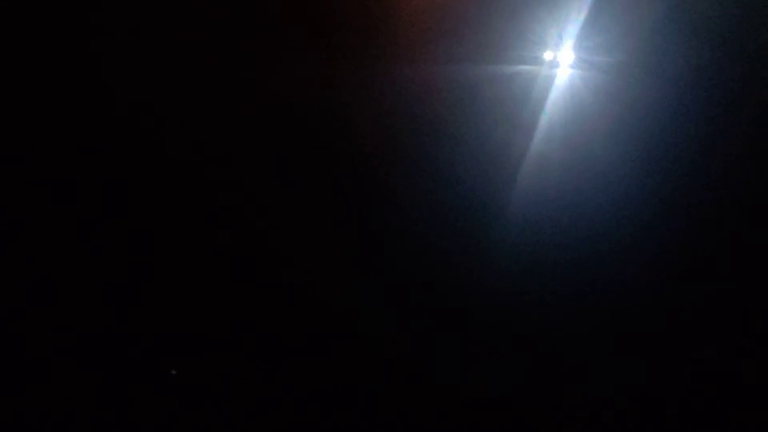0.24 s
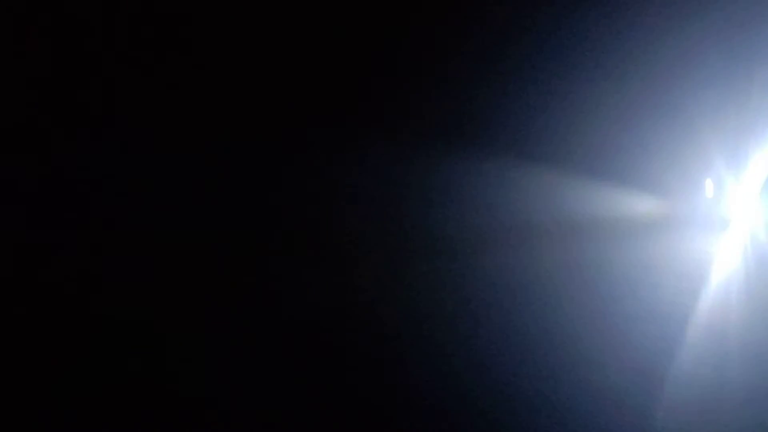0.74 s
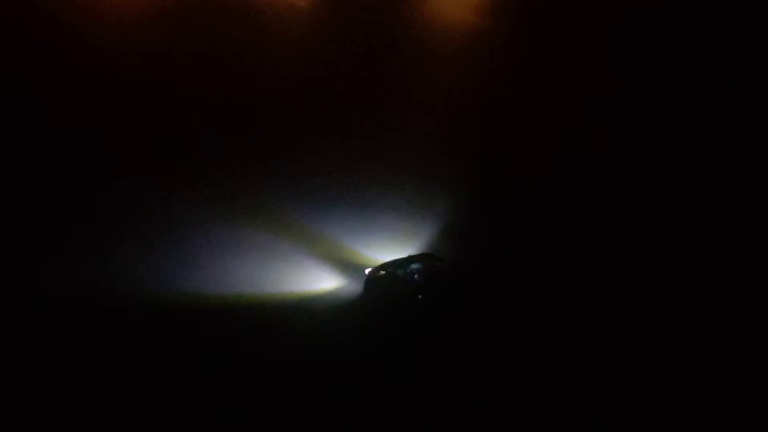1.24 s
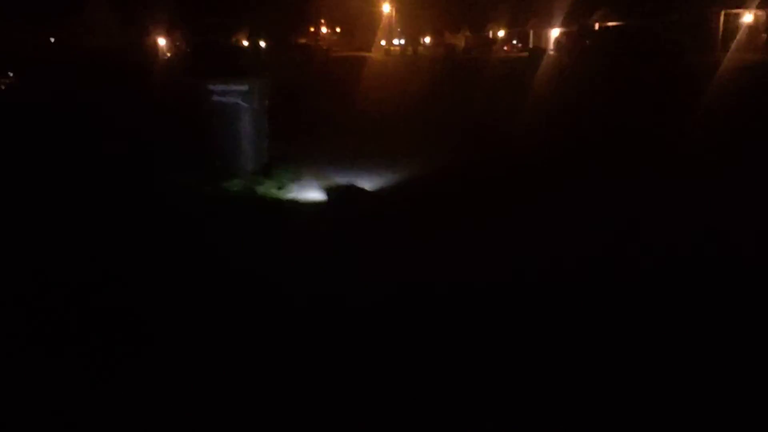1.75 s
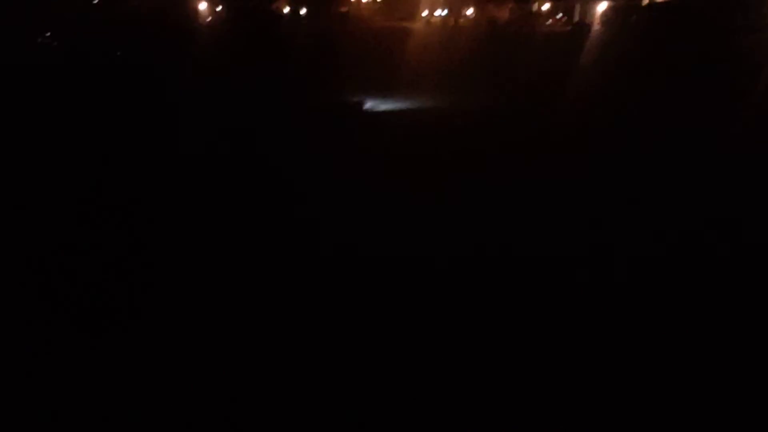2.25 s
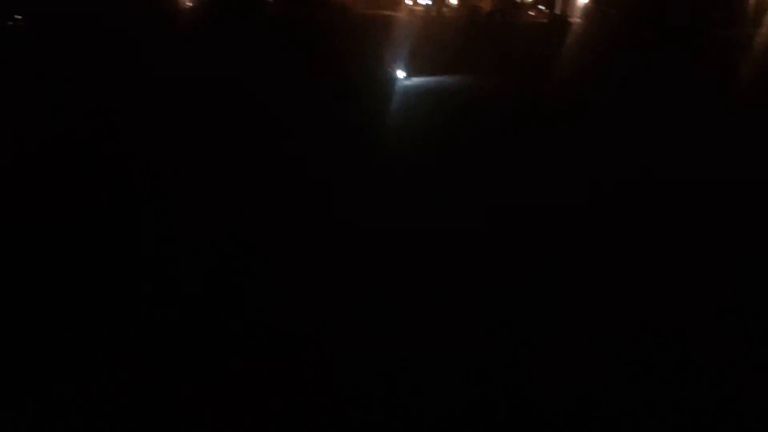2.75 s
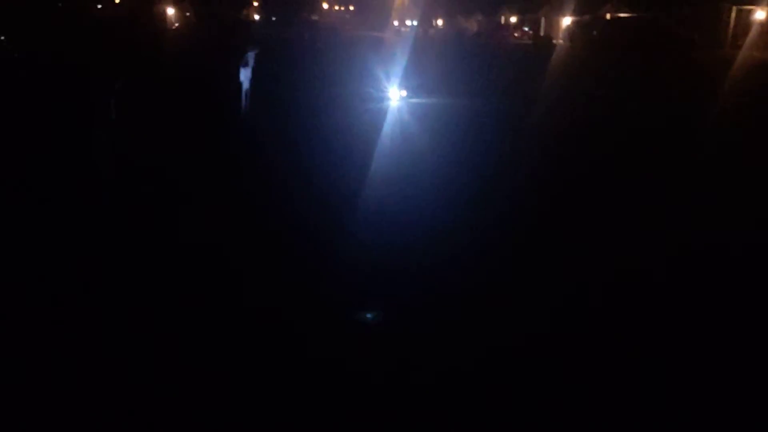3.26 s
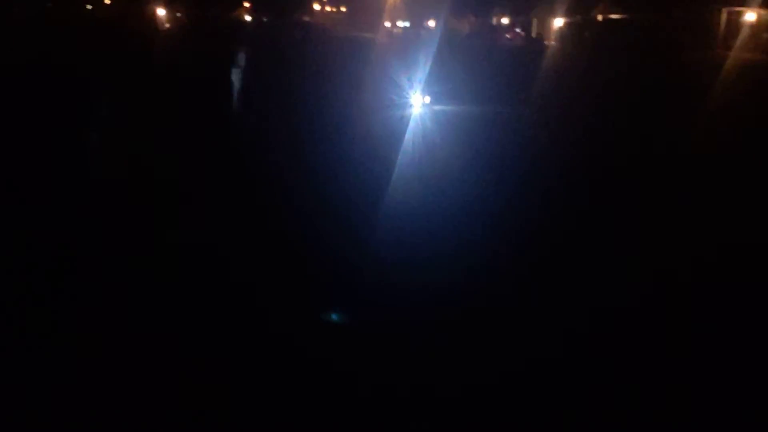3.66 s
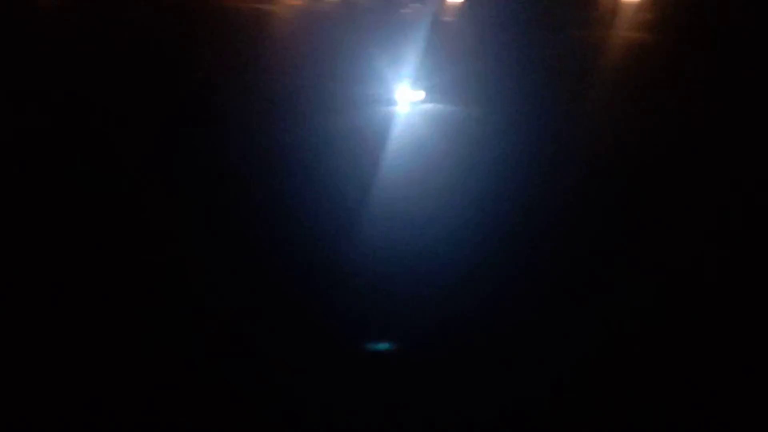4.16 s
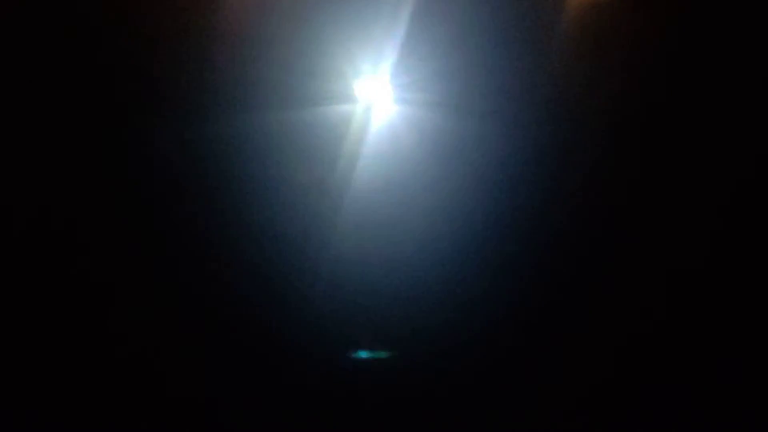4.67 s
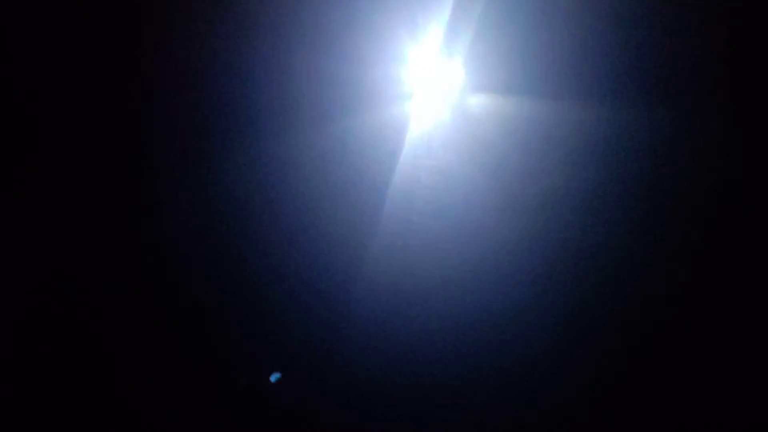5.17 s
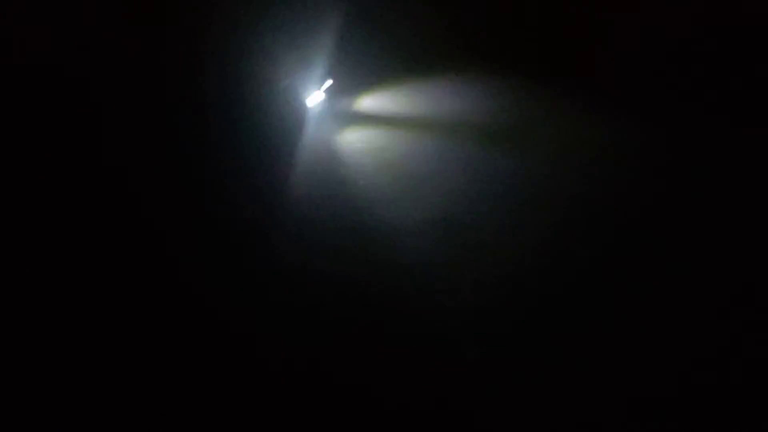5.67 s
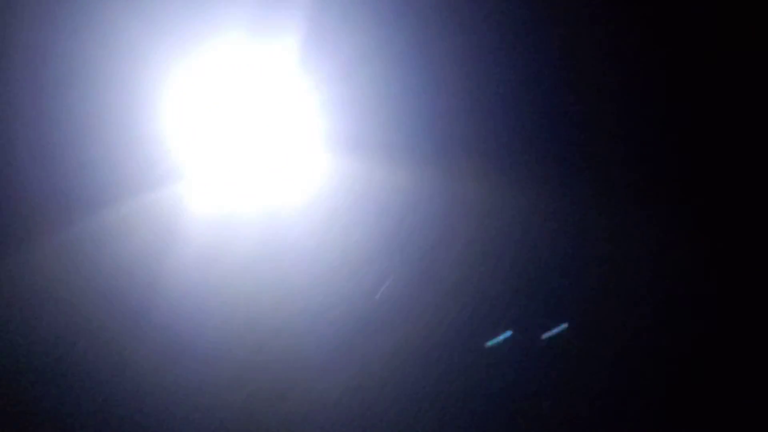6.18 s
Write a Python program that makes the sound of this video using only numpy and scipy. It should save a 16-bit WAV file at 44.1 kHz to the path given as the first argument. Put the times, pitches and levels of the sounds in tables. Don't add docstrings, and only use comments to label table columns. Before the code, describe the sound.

Open ground outdoors, close handheld stereo, almost no echo. A radio-controlled car is already spinning its wheels: a piercing, airy gear scream around 8.5 kHz with harsh plastic rattle. At 0.5 s the trigger knocks at left and pitch drops to about 4.7 kHz, then sags, buzzing, as tyres scrabble near 1 s. A brief stab to 5 kHz at 1.75-1.85 s comes with a cluster of trigger clicks until 2.0 s. The whine sinks through 2-2.8 s to a low, faint growl and nearly vanishes by 3.15 s. It pulls up at 3.2-3.4 s, then holds a higher scream at 3.55-3.95 s before falling. Pebbles tick around 4.1-4.2 s. The loudest, harshest blip bursts at 4.76-4.93 s. From 5.25 s to the end at 6.4 s, a rough 1.5 kHz whine continues with skids, drags and small dull bumps, now shifting slightly left. Distant traffic rumbles softly throughout.

```python
import sys
import numpy as np
from scipy import signal
from scipy.fft import rfft, irfft, next_fast_len
from scipy.io import wavfile
from scipy.ndimage import uniform_filter1d, map_coordinates

SR = 44100
rng = np.random.default_rng(int(sys.argv[2]) if len(sys.argv) > 2 else 0)


def volts(x):
    e = np.asarray(x, float) / 20
    return 10 ** e


def dump(signal):
    limited = np.clip(np.atleast_2d(signal).T, -1, 1)
    pcm = np.round(limited * 32767).astype(np.int16)
    wavfile.write(sys.argv[1], SR, pcm)


N = 283122

PINION_TEETH, GEAR_TEETH = 19, 47
FREE_HZ = 8700
EASE_HZ = 1200

# time_s, mesh_hz, rattle_db, whine_trim_db, brightness_db
ROLLING = [(0, 4720, -37, 1, 0), (.5, 4720, -34, 1, 0), (.66, 4720, -31, 1, 3), (.85, 4450, -30, 2, 3),
           (1.0, 4220, -29, 3, 3), (1.17, 4050, -29, 1, 1), (1.3, 3900, -29, -2, -1),
           (1.43, 3740, -33, -3, -1), (1.7, 3620, -38, -2, -2), (2.2, 2950, -42.5, -20, -3),
           (2.33, 2600, -43, -3, 0), (2.45, 2352, -43, 0, 1), (2.57, 1890, -46, 0, 0),
           (2.68, 1280, -48, -4, 0), (2.75, 960, -50, 0, -1), (2.85, 900, -53, -8, -2),
           (3.18, 930, -75, -8, 2), (3.52, 1980, -48, -5, 0), (4.12, 2780, -39, -3, -1),
           (4.31, 2216, -37, 1.5, -1), (4.74, 1915, -39, 1, -5), (5.1, 2690, -35.5, -3, -3),
           (5.22, 2490, -35, 3, -1), (5.45, 1850, -34.5, -3, 0), (5.6, 1660, -36, -5, -1),
           (5.77, 1510, -37, 4, -2), (5.88, 1500, -37.5, -1, -2), (6.42, 1580, -38, -2, -3)]
# press_s, spin_up_s, release_s, top_mesh_hz
BLIPS = [
    (-1, .1, .51, 8640),
    (1.745, .055, 1.842, 5320),
    (3.21, .19, 3.425, 7300),
    (3.545, .127, 3.95, 8530),
    (4.76, .107, 4.935, 7120),
]
# rattle_db, whine_trim_db, rise_bend (power), spin_down_s, teeth_part_s
BLIP_SOUNDS = [
    (-27.5, 2, 2.1, .08, -1),
    (-31.5, -1, 2.1, .073, 1.952),
    (-32.5, 3, 1.1, .062, 3.53),
    (-30, 0, 2.1, .113, 4.088),
    (-22.5, 0, 2.1, .073, 5.045),
]
# mesh_hz, level_db
WHINE = [(900, -11), (1500, -7), (2200, -2), (3400, -11), (4300, -9), (5200, -5), (6700, 2), (8200, -14)]
# start_s, length_s, level_db
AXLE_ODD = [
    (-.1, .65, -48),
    (.78, .93, -53),
    (3.77, .23, -50),
    (4.2, .45, -64),
]
# start_s, length_s, level_db
AXLE_SECOND = [
    (.64, .18, -40),
    (1.15, .3, -45),
    (1.4, .4, -39),
]
# start_s, length_s, level_db
AXLE_THIRD = [
    (1.47, .24, -50),
]
# centre_hz, width_hz, level_db
CASE_MODES = [(3585, 49, -5), (4036, 240, -2.5), (4766, 220, -7.5), (5200, 215, -2), (6100, 184, -11),
              (6590, 40, -0.5), (7110, 150, -7.5), (7530, 100, -1.5)]
# centre_hz, width_hz, level_db
SHELL_MODES = [(887, 180, -14), (1411, 76, -1.5), (1562, 120, -4.5), (1850, 210, -6), (2088, 88, -1.5),
               (2390, 84, -1.5), (2622, 130, -4.5), (2986, 135, -0.5), (3315, 95, -4)]
# centre_hz, width_hz, level_db
STRAIN_MODES = [(2600, 300, 0), (3000, 300, -1)]
# freq_hz, density_db (per Hz)
HISS = [(7400, -8), (8000, -14), (8600, 2), (8950, -1), (9250, -13), (9600, 2.5), (10800, 6.5),
        (11500, 3.5), (12500, 9.5), (14000, 6.5), (15500, 9), (17000, 1.5)]
# freq_hz, density_db (per Hz)
GRIT = [(500, -30), (700, -6), (950, 0), (1200, -4), (1500, -18)]
# start_s, length_s, level_db
SCRABBLES = [
    (.95, .4, -44),
    (1.85, .3, -55),
    (2.3, .6, -61),
    (3.7, .35, -56),
    (4.82, .18, -49),
    (5.35, .15, -52),
    (5.55, .5, -51),
    (6.05, .4, -54),
]
# freq_hz, density_db (per Hz)
SCRAPE = [(120, -30), (200, -3), (400, 0), (700, -2), (1100, -12), (1500, -30)]
# start_s, length_s, level_db
SKIDS = [
    (2.02, .2, -53),
    (2.2, .7, -65),
    (3.2, .3, -66),
    (4.75, .55, -60),
    (5.28, .19, -52),
    (5.52, .025, -42),
    (5.56, .2, -58),
    (5.78, .2, -54),
    (6.0, .5, -62),
]
# freq_hz, density_db (per Hz)
TRAFFIC = [(22, -46), (36, -6), (50, -1), (70, -1), (100, -4.5), (140, -9.5), (240, -17), (300, -26),
           (600, -35), (1400, -52), (2400, -38), (6400, -42), (9200, -60), (13000, -54)]
# start_s, length_s, level_db
PASSES = [
    (-.1, 1, -54),
    (1.0, .35, -49),
    (1.65, .25, -54),
    (2.9, .4, -54),
    (3.5, 2.5, -53),
    (6.04, .5, -53),
]
# time_s, peak_db, shell_tone_hz, t60_s
TRIGGER = [(0.001, -37.5, 587, 0.095), (0.533, -34.5, 382, 0.11), (0.549, -45, 377, 0.12),
           (1.697, -38, 589, 0.1), (1.734, -42, 412, 0.12), (1.753, -31.5, 447, 0.033),
           (1.814, -30.5, 375.5, 0.076), (1.831, -39, 412, 0.055), (1.976, -36, 580, 0.073),
           (1.988, -41, 629, 0.087), (1.994, -33, 590, 0.1), (2.012, -31, 580, 0.12),
           (2.02, -27, 600, 0.051), (3.399, -39, 410, 0.1), (3.547, -43.5, 585.3, 0.2),
           (3.962, -34.5, 392, 0.09), (4.226, -41, 461, 0.12), (4.233, -34.5, 420, 0.097),
           (4.932, -34, 487, 0.12), (4.937, -31.5, 371, 0.075), (4.949, -37.5, 414, 0.096),
           (5.988, -34, 417, 0.089)]
# freq_hz, level_db, t60_s
GRIP_MODES = [
    (447, -2.5, 0.059),
    (1002, -7.5, 0.02),
    (1177, -5, 0.03),
]
# start_s, length_s, level_db, pitch_hz
STEADY_TONES = [
    (.71, .18, -38, 4820),
    (1.26, .08, -42, 4750),
    (2.34, .23, -48, 1990),
    (2.68, .06, -59, 1980),
    (2.765, .04, -56, 930),
    (3.495, .025, -48, 2100),
    (4.1, .035, -39, 2600),
    (5.054, .028, -36, 2520),
]
# start_s, length_s, level_db, centre_hz
DRAGS = [
    (1.35, .45, -55, 620),
    (3.22, .9, -61, 1100),
    (4.8, .2, -49, 640),
    (5.27, .08, -49, 370),
    (5.34, .12, -45, 680),
    (5.5, .5, -52, 1200),
    (5.78, .2, -48, 250),
]
# time_s, peak_db
PEBBLES = [
    (1.976, -27),
    (2.3305, -30),
    (2.6547, -33),
    (2.8437, -36),
    (3.1716, -46),
    (3.5448, -35),
    (4.12, -27),
    (4.2255, -25),
    (5.0533, -26),
]
# time_s, peak_db, pitch_hz
BUMPS = [(5.278, -36, 371), (5.331, -32, 382), (5.381, -28, 692), (5.459, -37, 1160), (5.522, -29, 541),
         (5.581, -38, 832), (5.763, -40, 931), (5.784, -34, 840), (5.855, -33, 1040), (5.917, -34, 1070),
         (5.943, -32, 1160), (6.032, -38, 958), (6.083, -39, 880), (6.129, -41, 923), (6.19, -41, 869),
         (6.232, -43, 921), (6.351, -40, 810)]
# time_s, left_lag (samples), left_over_right_db
PLACE = [(0, 4.5, 0), (.4, 4.7, 0), (.61, 5.6, 0), (.66, 7.7, 0), (.9, 8, -.5), (1.04, 9, 0),
         (1.11, 6.8, 0), (1.17, 4, 2), (1.3, 3, 1.5), (1.7, 0, 1.5), (2.1, -2, 2.5), (2.7, 0, 1.5),
         (4.1, 0, 2), (4.5, -1.5, 2.5), (5.1, .5, 2), (5.5, -2, 2), (5.72, -4, 3.5), (5.85, -5.8, 3),
         (6.2, -6, 2), (6.3, -5.5, 3), (6.42, -3.5, 3.5)]
# freq_hz, likeness (0-1)
CAR_LIKENESS = [(300, .4), (700, .85), (2000, .94), (5000, .93), (10000, .76), (15000, .6)]
# freq_hz, likeness (0-1)
FAR_LIKENESS = [(30, .55), (80, .62), (160, .8), (500, .6), (4000, .5)]
# freq_hz, left_over_right_db
PORTS = [(60, 0.0), (150, 1.0), (380, 3.0), (950, 4.5), (2380, 2), (5980, 6), (15000, -1.5)]


def unit(x):
    return x / np.sqrt(np.mean(x ** 2) + 1e-20)


def along(points, hz):
    f, v = np.transpose(points)
    return np.interp(np.log(hz + 1), np.log(f + 1), v)


def curves(rows):
    s, *columns = np.transpose(rows)
    return [np.interp(np.arange(N) / SR, s, column) for column in columns]


def wobble(rate):
    at = np.arange(0, N + 8, 8)
    knots = rng.standard_normal(int(N * rate / SR) + 4)
    return np.interp(np.arange(N), at, map_coordinates(knots, [at * rate / SR]))


def stretches(rows, edge_s=.04):
    t = np.arange(N) / SR
    gain = 0
    for s, length, db in rows:
        swell = np.tanh((t - s) / edge_s * 2)
        fade = np.tanh((t - s - length) / edge_s * 2)
        gain = gain + volts(db) * (swell - fade) / 2
    return gain


def filtered(x, response):
    m = next_fast_len(N + 8192)
    return irfft(rfft(x, m) * response(np.fft.rfftfreq(m, 1 / SR)), m)[..., :N]


def modes(table, between_db):
    def response(f):
        total = volts(between_db)
        for k, (centre, width, db) in enumerate(table):
            damping = 1j * f * width
            total = total + (-1) ** k * volts(db) * damping / (centre ** 2 - f * f + damping)
        return total
    return response


def band(low_hz, high_hz):
    return lambda f: 1 / (1 + (low_hz / (f + 1)) ** 6) / (1 + (f / high_hz) ** 8)


def noise(response, gate=1):
    return unit(filtered(gate * rng.standard_normal((2, N)), response))


def tone(cycles, blur):
    size = np.sqrt(2) * volts(3.5 * wobble(70))
    return np.array([size * np.sin(2 * np.pi * cycles + blur * wobble(90)) for _ in range(2)])


def spread(pair, likeness):
    def shares(hz):
        turn = np.arccos(np.clip(along(likeness, hz), -1, 1)) / 2
        return np.array([np.cos(turn), np.sin(turn)])
    mid, side = filtered(pair, shares)
    return np.array([mid + side, mid - side])


def patchy(x, depth_db):
    z = signal.stft(x, nperseg=512)[2]
    field = uniform_filter1d(rng.standard_normal(z.shape[1:]), size=3, axis=0)
    field = uniform_filter1d(field, size=25, axis=1)
    return signal.istft(z * volts(depth_db * unit(field)), nperseg=512)[1][:, :N]


def drive():
    t = np.arange(N) / SR
    mesh_hz, roll_db, trim_db, bright_db = curves(ROLLING)
    grip_hz, power = mesh_hz, volts(2 * roll_db)
    throttle, slack = np.zeros(N), np.zeros(N)
    for (press, rise, release, top_hz), (db, sings_db, bend, spin_down, part) in zip(BLIPS, BLIP_SOUNDS):
        held = np.exp(-(np.clip(t - release, 0, None) / spin_down) ** 2.4)
        spin = held * (1 - np.exp(-(np.clip(t - press, 0, None) / rise) ** bend))
        mesh_hz = mesh_hz + spin * (top_hz - grip_hz)
        power = power + volts(2 * db) * spin ** (2 * 1.05)
        throttle = throttle + held ** 2 * np.sqrt(spin) * (1 - grip_hz / top_hz)
        trim_db = trim_db + np.sqrt(spin) * (sings_db - trim_db)
        trim_db = trim_db - 11 * np.exp(-((t - part + .012) / .028) ** 2)
        slack = slack + np.exp(-((t - part) / .013) ** 2)
    rattle_db = 10 * np.log10(power) - 6 * slack
    return mesh_hz, roll_db, rattle_db, trim_db, bright_db, throttle


def tooth_shift(mesh_hz, big, small, load, throttle):
    fast = (mesh_hz / 5000) ** 2 * (.85 + .8 * load) + .2
    chatter = fast * (.04 * small + .03 * wobble(400))
    coasting = .055 * (1 - np.clip(throttle, 0, 1)) * wobble(200)
    return .05 * big + chatter + coasting


def mesh_whine(teeth, shift, throb, whine_db):
    whine = volts(whine_db + 1.5) * throb * tone(teeth + shift, 1.0)
    return filtered(whine, lambda f: volts(-5) + np.abs(modes(SHELL_MODES + CASE_MODES, -40)(f)))


def torque_orders(teeth, shift, throb, whine_db, load_db, load):
    second = np.maximum(load, .7) * volts(whine_db - 10) * tone(2 * teeth + shift, 1.2)
    half = tone(teeth / 2 + .6 * shift, .8)
    one_and_half = volts(-4) * tone(1.5 * teeth + shift, 1.2)
    return second + volts(load_db) * throb * (half + one_and_half)


def axle_gear(teeth, shift):
    odd = stretches(AXLE_ODD)
    gains = odd, stretches(AXLE_SECOND), volts(6) * odd + stretches(AXLE_THIRD)
    cycles = .2725 * teeth
    return sum(gain * tone(k * cycles + 0.69 * shift, 0.98) for k, gain in enumerate(gains, 1))


def motor_shaft(teeth, mesh_hz, roll_db, throttle):
    fast = np.clip((mesh_hz - 6800) / EASE_HZ + .5, 0, 1)
    return volts(roll_db - 15) * throttle * fast * tone(teeth / PINION_TEETH, 0.18)


def tooth_rattle(mesh_hz, roll_db, rattle_db, bright_db, throttle, big, small):
    gate = volts(0.87 * big + 0.43 * small + 1.54 * wobble(400) + 0.84 * wobble(30))
    spin_db = np.clip(rattle_db - roll_db, 0, 14)
    shell_db = 1.5 + .4 * bright_db - .3 * spin_db + .8 * wobble(9)
    hiss_db = -3 + bright_db + .8 * np.log2(mesh_hz / 3000) + 1.2 * wobble(11)
    rattle_db = rattle_db + .8 * wobble(12)
    case = noise(lambda f: modes(CASE_MODES, -12)(f) * band(3200, 8000)(f), gate)
    shell_gate = gate * volts(0.54 * wobble(70))
    shell = noise(lambda f: modes(SHELL_MODES, -18)(f) * band(1120, 3500)(f), shell_gate)
    hiss = noise(lambda f: volts(along(HISS, f)), gate)
    strain = noise(lambda f: modes(STRAIN_MODES, -30)(f) * band(2000, 3600)(f), gate)
    strain = volts(-1) * np.sqrt(throttle) * mesh_hz / FREE_HZ * strain
    body = patchy(case + volts(shell_db - 3.0) * shell + strain, depth_db=1.9)
    return volts(rattle_db - 2.5) * (body + volts(hiss_db + 2.5) * hiss)


def tyre_roll(roll_db):
    plate = modes([(950, 110, 0)], -15)
    grit = noise(lambda f: volts(along(GRIT, f)) * plate(f), volts(3.2 * wobble(50)))
    return (volts(roll_db - 25) + stretches(SCRABBLES)) * grit


def tyre_skid(roll_db):
    scrape = noise(lambda f: volts(along(SCRAPE, f)), volts(2.6 * wobble(120)))
    return (volts(roll_db - 27) + stretches(SKIDS)) * scrape


def traffic():
    level = np.hypot(volts(-56), stretches(PASSES)) * volts(3.0 + 1.2 * wobble(4))
    return level * spread(noise(lambda f: volts(along(TRAFFIC, f))), FAR_LIKENESS)


def trigger():
    out, t = np.zeros((2, N + SR)), np.arange(SR // 4) / SR
    for s, db, hz, t60 in TRIGGER:
        ring = volts(-60 * t / t60) * np.sin(2 * np.pi * hz * t)
        for mode_hz, level_db, mode_t60 in GRIP_MODES:
            varied_db = level_db + rng.normal(0, 4.2)
            ring += volts(varied_db - 60 * t / mode_t60) * np.sin(2 * np.pi * mode_hz * t)
        ring *= 1 - np.exp(-t / 0.0015)
        tick = volts(-11 - 60 * t / 0.0062) * rng.standard_normal(len(t))
        knock = ring * volts([[0], [-18]]) + tick * volts([[0], [-3]])
        out[:, round(s * SR):][:, :len(t)] += volts(db + 5.5) * knock
    return out[:, :N]


def steady_tones():
    s, length, db, hz = np.transpose(STEADY_TONES)
    now = np.clip(np.searchsorted(s - .03, np.arange(N) / SR) - 1, 0, None)
    return stretches(zip(s, length, db), edge_s=.012) * tone(np.cumsum(hz[now]) / SR, 1.1)


def chassis_drags():
    rub = volts(2.5 * wobble(60)) * rng.standard_normal(N)
    out = np.zeros(N)
    for s, length, db, hz in DRAGS:
        sos = signal.butter(2, [.7 * hz, 1.4 * hz], "band", fs=SR, output="sos")
        out += stretches([(s, length, db)], edge_s=.025) * unit(signal.sosfilt(sos, rub))
    return out


def pebbles():
    t = np.arange(N) / SR
    flicks = sum(volts(db - 1 - 60 * np.abs(t - s) / .012) * (t > s) for s, db in PEBBLES)
    return flicks * rng.standard_normal((2, N))


def chassis_bumps():
    out, t = np.zeros(N + SR), np.arange(SR // 10) / SR
    shape = volts(-2 - 60 * t / .05) * (1 - np.exp(-t / .002))
    for s, db, hz in BUMPS:
        out[round(s * SR):][:len(t)] += volts(db) * shape * np.sin(2 * np.pi * hz * t)
    return out[:N]


def car(mesh_hz, roll_db, rattle_db, trim_db, bright_db, throttle):
    whine_db = rattle_db + along(WHINE, mesh_hz) + trim_db + 2.2 * wobble(13)
    teeth = np.cumsum(mesh_hz) / SR
    big = np.cos(2 * np.pi * teeth / GEAR_TEETH)
    small = np.cos(2 * np.pi * teeth / PINION_TEETH)
    throb = unit(1 + .6 * big + .45 * small + .15 * np.cos(np.pi * teeth / GEAR_TEETH))
    easing = np.clip(1 - (FREE_HZ - mesh_hz) / EASE_HZ, 0, 1)
    load_db = rattle_db - 5 - 12 * easing + 20 * np.log10(throttle + 1e-3)
    load = np.clip((load_db + 70) / 25, 0, 1)
    shift = tooth_shift(mesh_hz, big, small, load, throttle)
    gears = mesh_whine(teeth, shift, throb, whine_db)
    gears = gears + torque_orders(teeth, shift, throb, whine_db, load_db, load)
    gears = gears + axle_gear(teeth, shift) + motor_shaft(teeth, mesh_hz, roll_db, throttle)
    rattle = tooth_rattle(mesh_hz, roll_db, rattle_db, bright_db, throttle, big, small)
    return gears + rattle + throb * steady_tones()


def ground(roll_db):
    chassis = (chassis_drags() + chassis_bumps()) * np.array([[1], [0]])
    return tyre_roll(roll_db) + tyre_skid(roll_db) + chassis + pebbles()


def placed(pair):
    lag, pan_db = curves(PLACE)
    lag = lag + .7 * np.clip(np.abs(lag) / 5, 0, 1) * wobble(14)
    left, right = spread(pair, CAR_LIKENESS)
    at = np.arange(N)
    left = map_coordinates(left, [at - lag / 2]) * volts(pan_db / 2)
    right = map_coordinates(right, [at + lag / 2]) * volts(-pan_db / 2)
    return np.array([left, right])


def port_colour(f):
    return volts(1.06 * (f > 1200) * (along(PORTS, f) - 3) * np.array([[.5], [-.5]]))


def scene():
    motion = drive()
    roll_db = motion[1]
    moving = placed(car(*motion) + ground(roll_db))
    return filtered(moving, port_colour) + trigger() + traffic()


def top_cut(x):
    return signal.sosfilt(signal.butter(12, 17110, fs=SR, output="sos"), x)


def record(dry):
    return top_cut(filtered(dry, lambda hz: hz < 15900))


dry = scene()
out = record(dry)
dump(out)
```